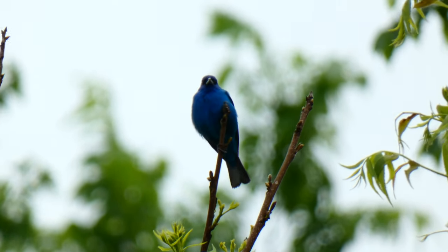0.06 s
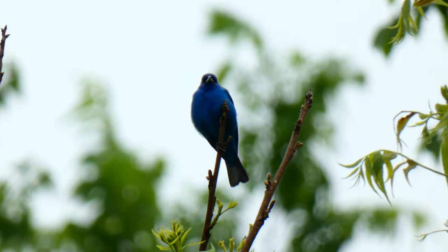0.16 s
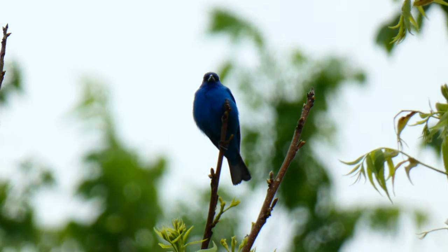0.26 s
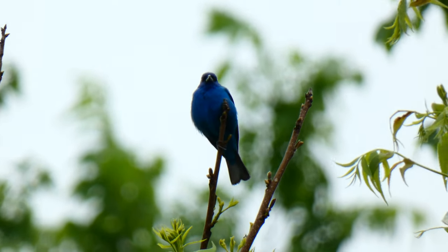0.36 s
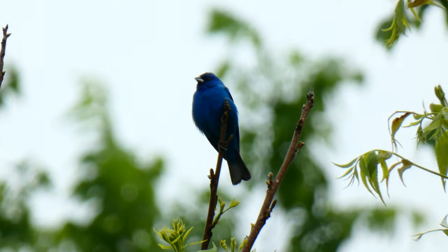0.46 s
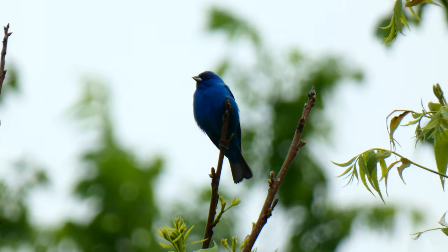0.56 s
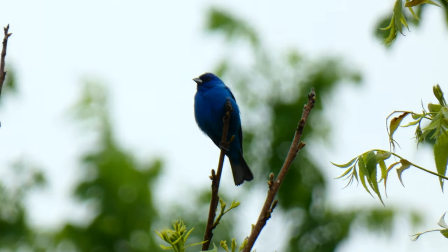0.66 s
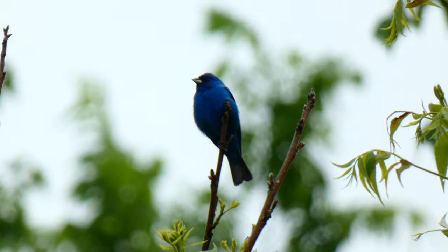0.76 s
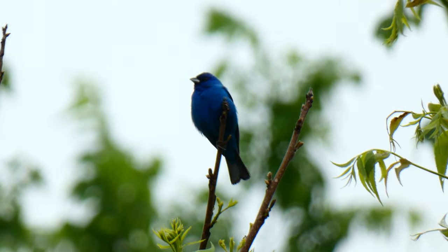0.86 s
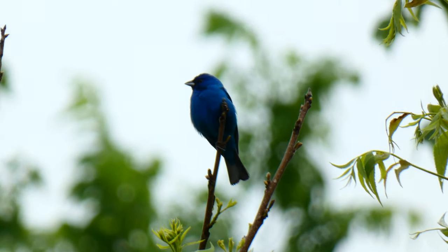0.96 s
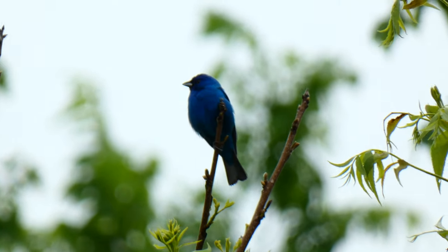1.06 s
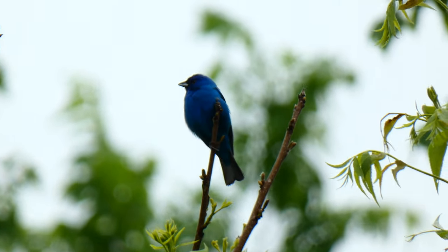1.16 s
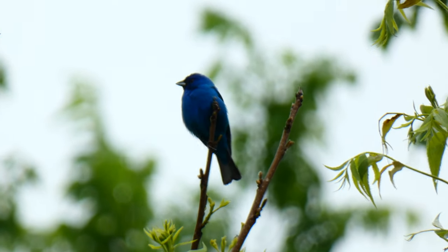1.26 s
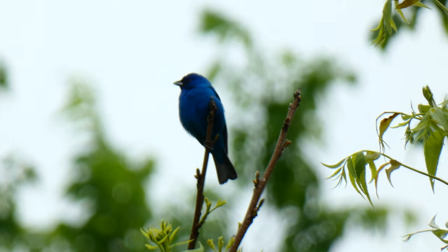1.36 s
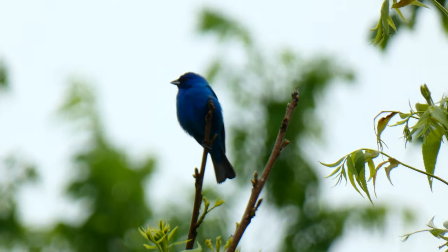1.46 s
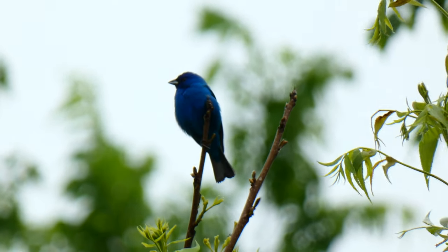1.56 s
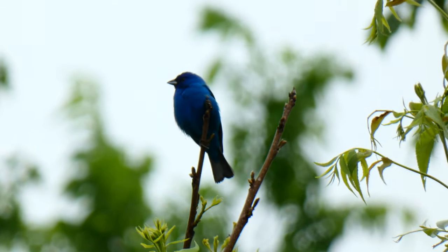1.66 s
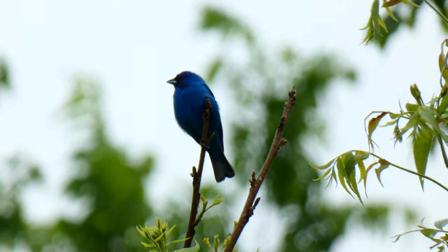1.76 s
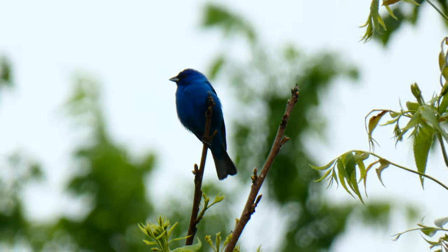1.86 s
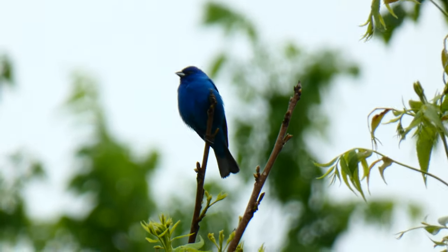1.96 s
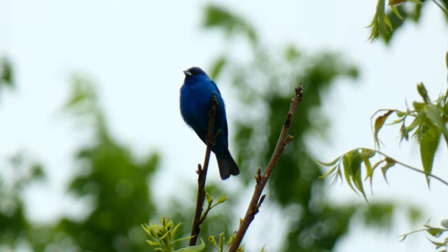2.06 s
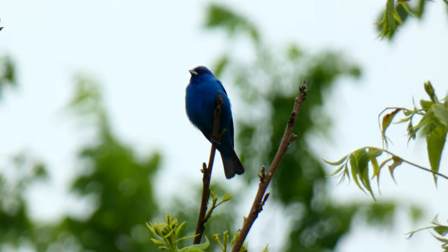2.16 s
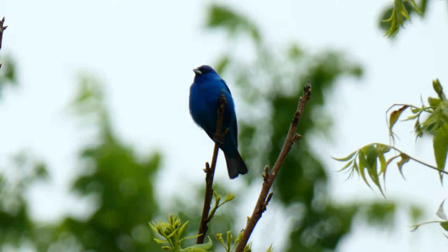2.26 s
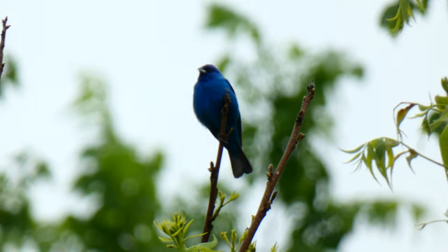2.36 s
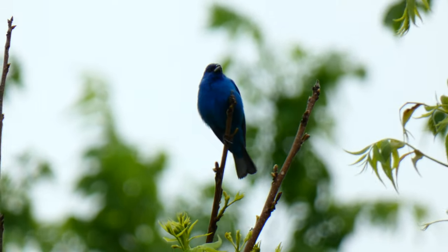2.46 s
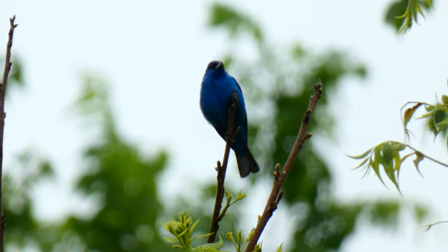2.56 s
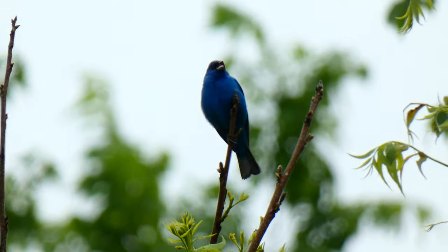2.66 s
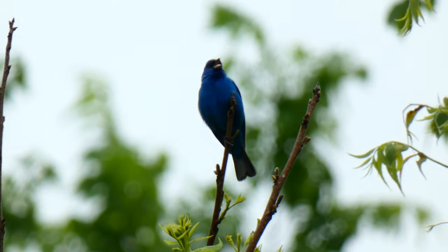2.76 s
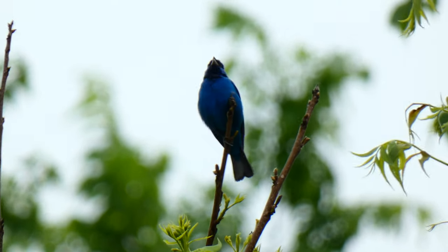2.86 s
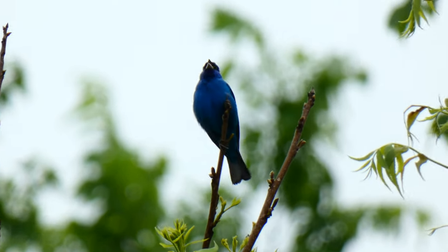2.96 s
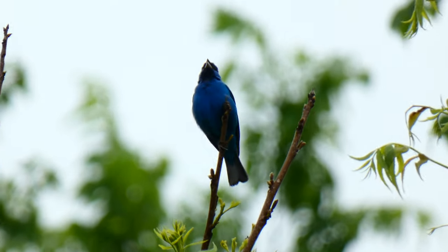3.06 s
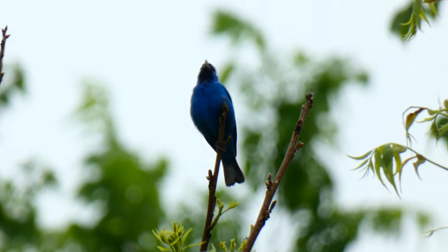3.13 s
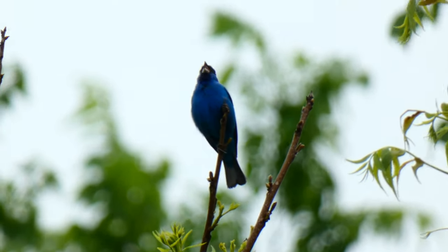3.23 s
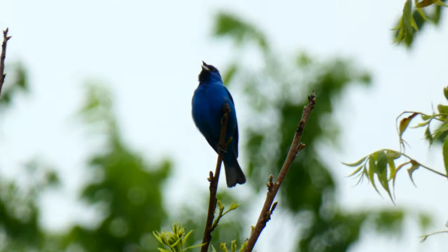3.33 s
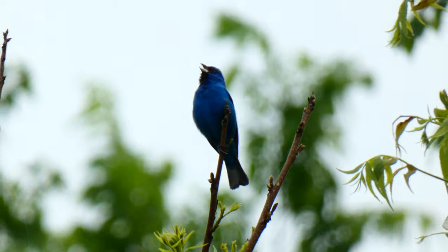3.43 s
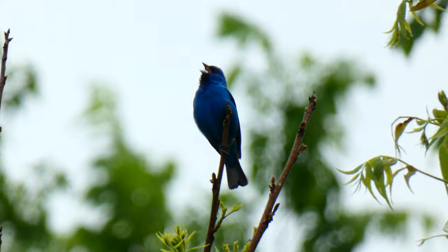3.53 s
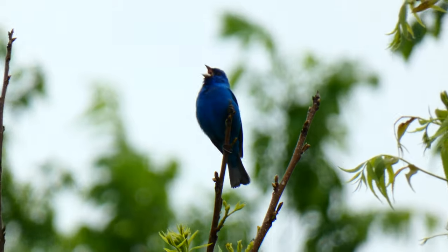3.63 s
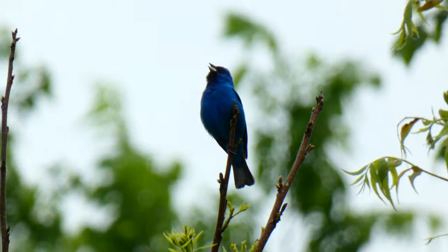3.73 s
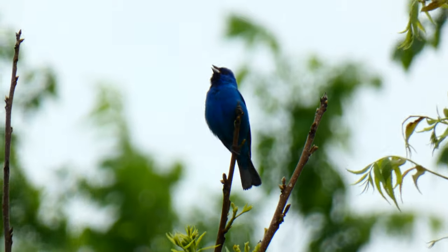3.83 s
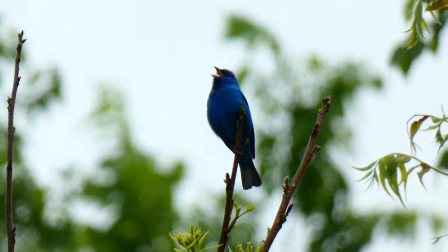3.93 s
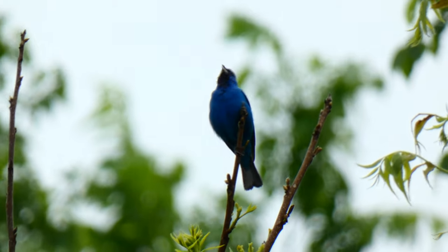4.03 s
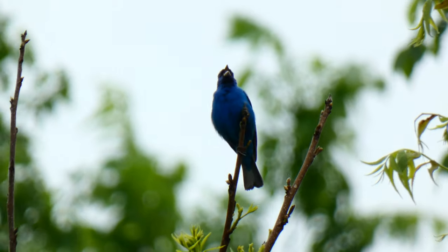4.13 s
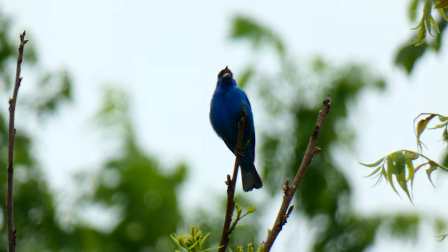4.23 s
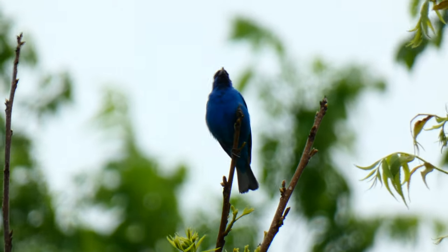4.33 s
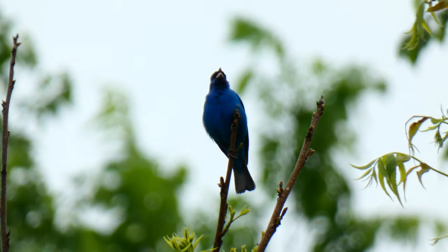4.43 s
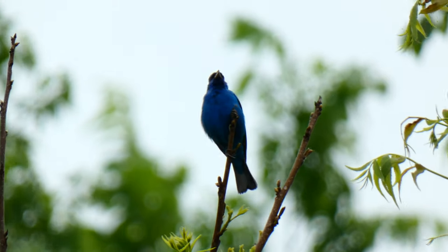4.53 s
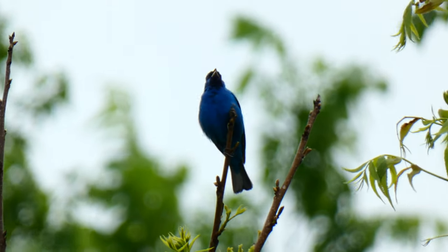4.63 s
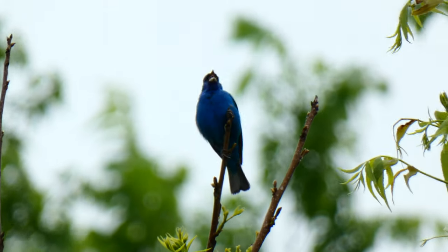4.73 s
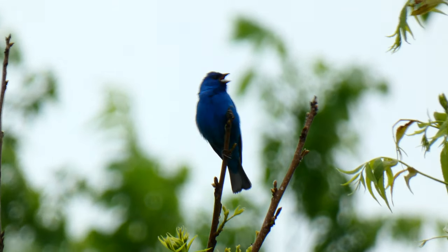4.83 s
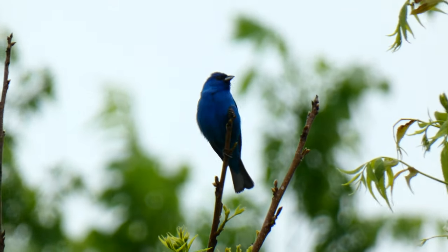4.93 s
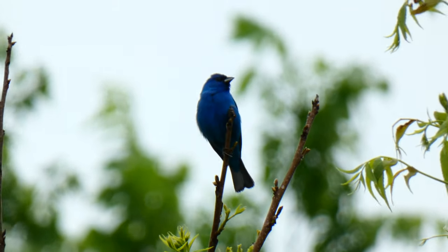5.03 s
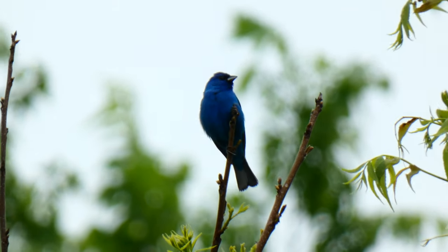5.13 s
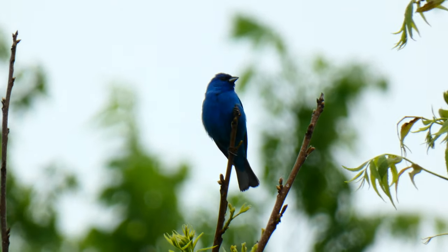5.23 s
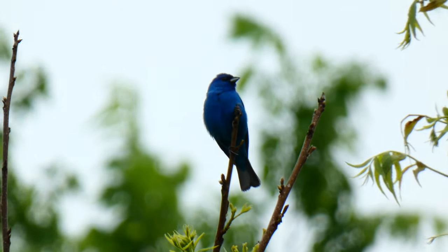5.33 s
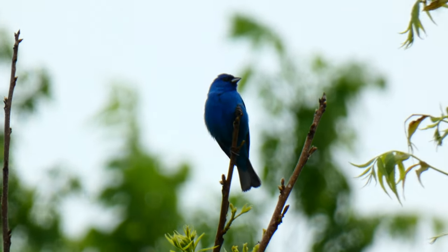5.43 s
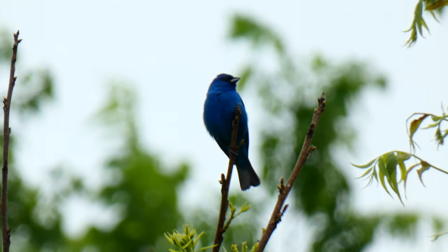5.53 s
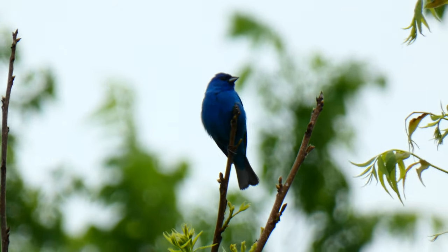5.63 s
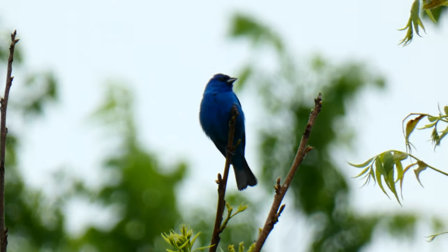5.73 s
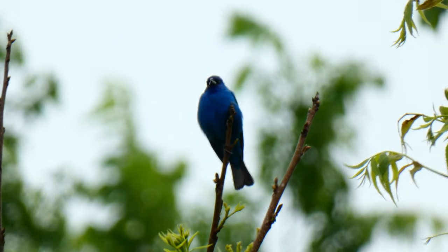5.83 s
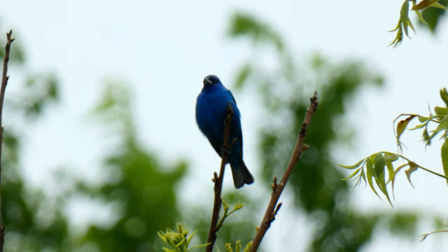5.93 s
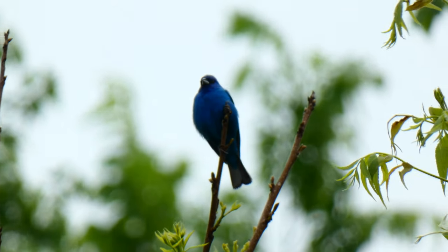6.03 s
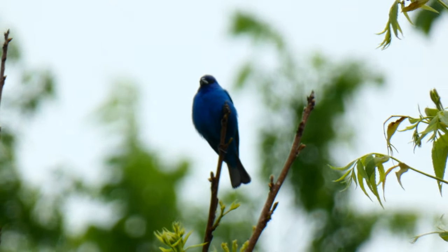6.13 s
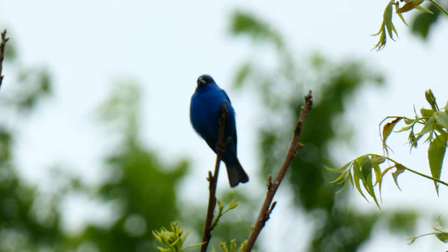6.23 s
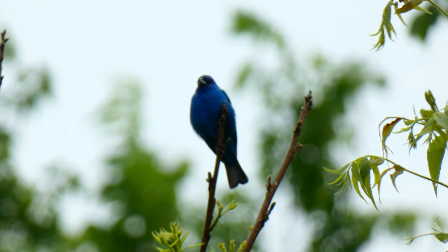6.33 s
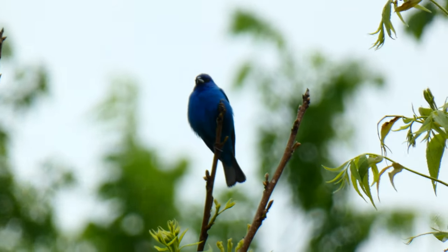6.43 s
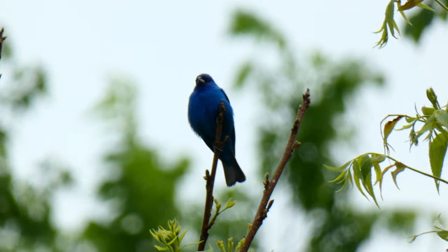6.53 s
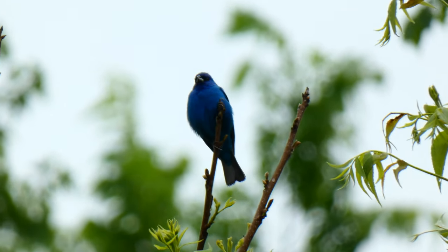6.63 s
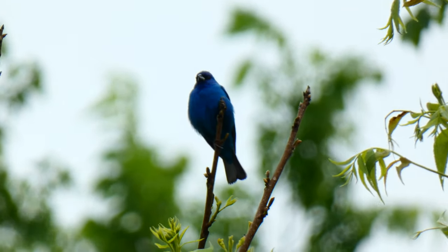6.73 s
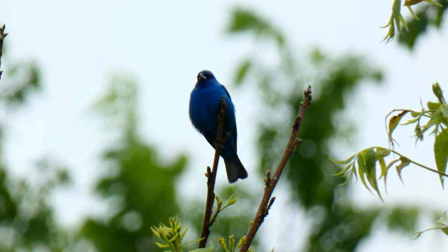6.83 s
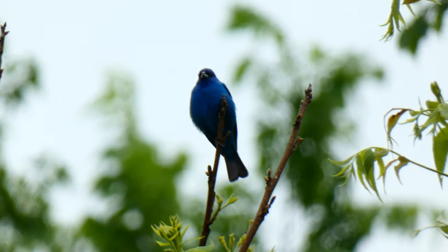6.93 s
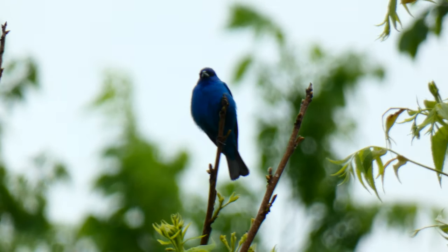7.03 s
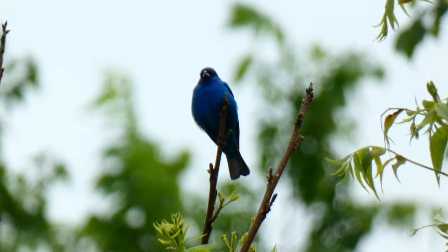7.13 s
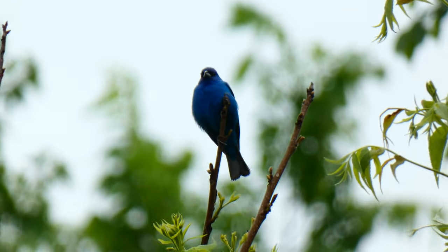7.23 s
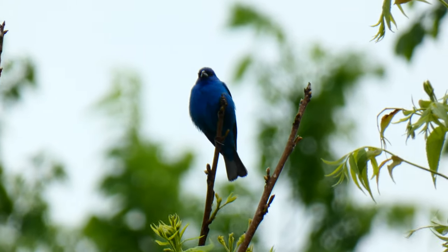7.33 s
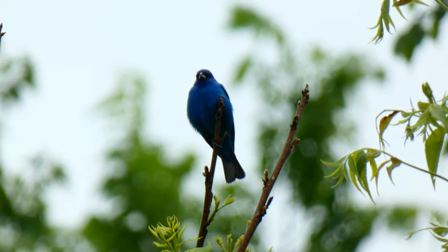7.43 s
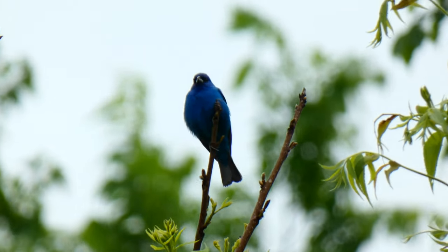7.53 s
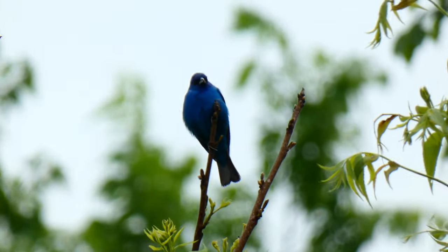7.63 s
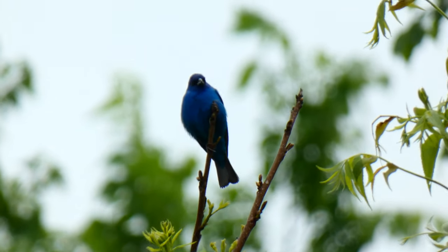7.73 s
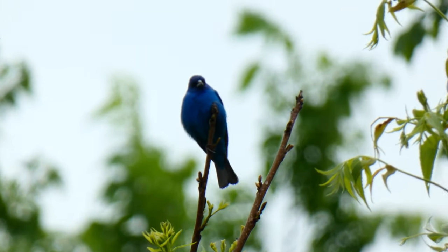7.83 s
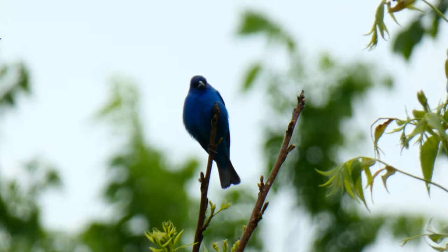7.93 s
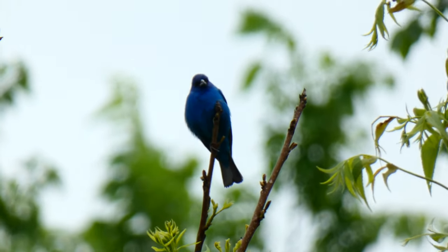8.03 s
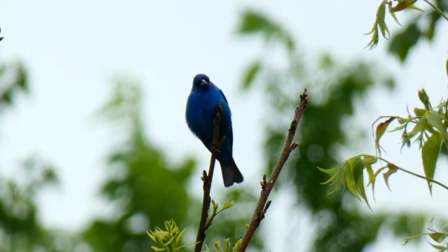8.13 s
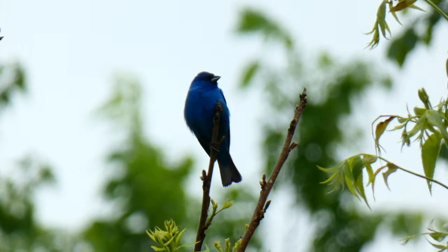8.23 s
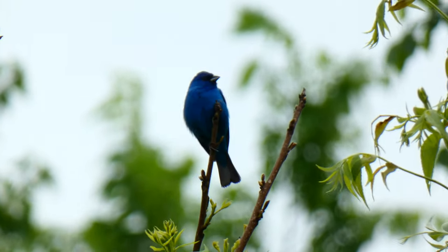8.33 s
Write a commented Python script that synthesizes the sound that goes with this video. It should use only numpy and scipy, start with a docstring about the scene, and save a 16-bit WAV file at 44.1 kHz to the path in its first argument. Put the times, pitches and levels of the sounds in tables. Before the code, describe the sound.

A small songbird sings one high, quick song of paired notes outdoors, with faint distant chirps and a low steady hum around it.

```python
"""A bunting on a bare twig sings one song: thin whistles, two stutters, a buzz, two swoops, a flourish.
Its voice organ, the syrinx, makes an almost pure tone that slides quickly up and down in pitch.
Swaying trees scatter the song back, and other small birds chirp far off.
Under it lie a faint insect, one short low note, a distant rumble, the hum and ticks of a camera's
lens motor, and microphone hiss."""
import sys
import numpy as np
from scipy import signal
from scipy.fft import rfft, irfft, next_fast_len
from scipy.io import wavfile
from scipy.ndimage import uniform_filter1d, map_coordinates

SR = 44100
rng = np.random.default_rng(int(sys.argv[2]) if len(sys.argv) > 2 else 0)


def bounce(signal):
    """Save signal as a 16-bit WAV file at the path given by the first command-line argument."""
    frames = np.transpose(np.atleast_2d(signal))
    limited = np.clip(frames, -1, 1)
    pcm = np.round(limited * 32767).astype(np.int16)
    wavfile.write(sys.argv[1], SR, pcm)


N = 369558


# how well the throat and beak let overtones out: (frequency [Hz], gain [dB])
BEAK_GAIN = [(5000, -11.5), (7500, 12), (8600, 11.5), (10500, 3.5), (13000, -3.5), (15500, -1.5)]
def syrinx(hz, gain, tremble=.004, bright_db=0, second_db=-50, third_db=-41):
    """A bird's voice: a slightly trembling tone, two flickering overtones and a rasp."""
    edge = rasp(hz)
    hz = hz * (1 + tremble * wobble(500, len(hz)))
    phase = 2 * np.pi * np.cumsum(hz) / SR
    overtones = 0
    for k, db in [(2, second_db + bright_db), (3, third_db)]:
        overtones += amp(db + along(BEAK_GAIN, k * hz)) * np.sin(k * phase) * (k * hz < SR / 2)
    flicker = amp(3.5 * wobble(160, len(hz)))
    fade = signal.windows.tukey(len(hz), min(1, .004 * SR / len(hz)))
    shimmer = amp(.7 * wobble(200, len(hz)))
    return np.sqrt(2) * gain * fade * shimmer * (np.sin(phase) + flicker * overtones + edge)


def rasp(hz, level_db=-37, fast_hz_per_s=200000, low_hz=9000, high_hz=13000):
    """A hissy edge on the voice, stronger when the pitch is high and moving fast."""
    speed = np.minimum(np.abs(np.gradient(hz)) * SR / fast_hz_per_s, 1)
    speed = uniform_filter1d(speed, size=300)
    band = signal.butter(2, [low_hz, high_hz], "band", fs=SR)
    edge = signal.lfilter(*band, rng.standard_normal(len(hz)))
    return amp(level_db) * speed * (2 * hz / low_hz) ** 1.4 * unit(edge)


# how strongly the bird sings each pitch: (pitch [Hz], gain [dB])
VOICE_STRENGTH = [(2000, -39), (2450, -16), (2800, -15.5), (3060, -8.5), (3500, -8.5), (3800, 0.5),
                  (4300, -0.5), (4700, -2), (5400, 1), (6100, 0.5), (6650, -3.5), (7150, -19.5),
                  (8500, -21)]
def glide(hz, gain, break_hz=4037, break_width_hz=126, break_db=-9):
    """A sliding note: loud in the middle of the bird's range, with a dip where the voice breaks."""
    dip_db = break_db * np.exp(-((hz - break_hz) / break_width_hz) ** 2)
    return syrinx(hz, gain * amp(along(VOICE_STRENGTH, hz) + dip_db))


# held notes: (time [s], length [s], start pitch [Hz], middle pitch [Hz], end pitch [Hz], level [dB])
WHISTLE_NOTES = [(2.533, 0.045, 5950, 5900, 5100, -58.5), (2.585, 0.053, 5120, 5245, 5160, -44.5),
                 (2.756, 0.052, 6250, 6700, 6750, -40), (2.81, .062, 5835, 5924, 5900, -30.5),
                 (3.16, 0.028, 2770, 3014, 3000, -39.5), (3.417, 0.026, 2800, 3015, 3080, -36.5)]
# each whistle swells and breaks off: (share of its length [0 to 1], gain [dB])
WHISTLE_SWELL = [(0, -17), (.4, -3.5), (.7, -2.5), (.88, 0.5), (1, -10)]
# extra strength of the overtone an octave up: (time [s], boost [dB])
OCTAVE_BOOST = [(2.74, 0), (2.76, 25), (2.805, 26), (2.82, 9)]
def whistles():
    """Notes of nearly level pitch: the song's opening, and a pip after each stutter."""
    out = np.zeros(N)
    for s, length, first, middle, last, db in WHISTLE_NOTES:
        u = np.linspace(0, 1, int(length * SR))
        hz = arc(2 * u - 1, first, middle, last)
        swell_db, = curves(WHISTLE_SWELL, u)
        bright_db, = curves(OCTAVE_BOOST, s + u * length)
        add(out, s, syrinx(hz, amp(db + swell_db), bright_db=bright_db))
    return out


# sliding notes: (time [s], length [s], from pitch [Hz], to pitch [Hz], settling time [s], effort [dB])
SLIDE_NOTES = [(2.866, 0.15, 6060, 3700, 0.049, -37), (3.201, 0.084, 4360, 3374, 0.044, -24.5),
               (3.453, 0.086, 4467, 3310, .05, -23.5), (4.175, .1, 2364, 4247, 0.02, -23.5),
               (4.506, 0.097, 2144, 4300, 0.02, -24.5)]
def slides(attack_s=0.017, release_s=0.013):
    """The voice leaves one pitch lazily and settles toward another."""
    out = np.zeros(N)
    for s, length, from_hz, to_hz, settle, db in SLIDE_NOTES:
        t = np.arange(int(length * SR)) / SR
        hz = to_hz + (from_hz - to_hz) * np.exp(-(t / settle) ** 1.48)
        fade = np.minimum(t / attack_s, 1) * np.minimum((length - t) / release_s, 1)
        add(out, s, glide(hz, amp(db) * fade))
    return out


# the two stutters: (time [s], level [dB])
STUTTER_STARTS = [(3.1, -27.5), (3.3551, -22.5)]
# the four falling notes in a stutter: (gain [dB])
STUTTER_GAINS = [-9.5, -2, -1.5, -2.5]
def stutters(spacing_s=.0131, note_s=0.019, top_hz=6690, end_hz=3710, sink_hz=290):
    """Quick overlapping notes; each hangs at the top, then plunges lower than the one before."""
    out, u = np.zeros(N), np.linspace(0, 1, int(note_s * SR))
    envelope = np.abs(np.sin(np.pi * u)) ** 1.5
    for s, db in STUTTER_STARTS:
        for k, note_db in enumerate(STUTTER_GAINS):
            hz = top_hz + (end_hz - k * sink_hz - top_hz) * u ** 2
            add(out, s + k * spacing_s, syrinx(hz, amp(db + note_db) * envelope))
    return out


# the buzz rises and falls: (time [s], centre pitch [Hz], level [dB])
BUZZ_PATH = [(3.624, 3800, -45), (3.648, 4260, -26), (3.66, 4490, -27), (3.68, 5590, -23.5),
             (3.70, 6070, -24.5), (3.725, 6330, -26.5), (3.76, 5790, -25), (3.782, 5220, -29),
             (3.805, 4510, -29), (3.835, 4055, -28.5), (3.86, 3750, -33.5), (3.885, 3460, -36.5),
             (3.915, 3356, -38.5), (3.93, 3300, -63.5)]
# its swings slow down and narrow: (time [s], swings [per s], depth [share of the pitch])
BUZZ_SWINGS = [(3.624, 103, .14), (3.74, 97, .145), (3.83, 92, .105), (3.93, 84, .09)]
def buzz(dip_db=7.5):
    """A note whose pitch swings fast, loud on each rise and weak on the fall back."""
    out, t = np.zeros(N), span(BUZZ_PATH)
    hz, db = curves(BUZZ_PATH, t)
    rate, depth = curves(BUZZ_SWINGS, t)
    turn = -3.5 + 2 * np.pi * np.cumsum(rate) / SR + 0.62 * wobble(70, len(t))
    swing = depth * (np.sin(turn) - 0.34 * np.sin(2 * turn) - 0.04 * np.cos(2 * turn))  # lopsided
    gain = amp(db + 2.5 - dip_db * (1 - np.cos(turn)) / 2)
    add(out, t[0], syrinx(hz * (1 + swing), gain, tremble=.018))
    return out


# the two swoops: (time [s], effort [dB])
SWOOP_STARTS = [(4.031, -25.5), (4.3501, -26)]
# each shoots up and sinks: (time into the swoop [s], pitch [Hz])
SWOOP_PATH = [(0, 4254), (.015, 8100), (.023, 7150), (.035, 6580), (.062, 5435), (.087, 3640), (.106, 3060),
              (.122, 2440)]
# the other side of the syrinx shoots up too: (time into the swoop [s], pitch [Hz])
UPSTROKE_PATH = [(.002, 5200), (.007, 7560), (.0115, 9500), (.0135, 9900)]
def swoops(attack_s=0.0096, release_s=0.014, upstroke_db=-16.5):
    """One deep swoop, sung twice; at its start both sides of the syrinx sound."""
    out, t, up_t = np.zeros(N), span(SWOOP_PATH), span(UPSTROKE_PATH)
    hz, = curves(SWOOP_PATH, t)
    up_hz, = curves(UPSTROKE_PATH, up_t)
    fade = np.minimum(t / attack_s, 1) * np.minimum((t[-1] - t) / release_s, 1)
    for s, db in SWOOP_STARTS:
        add(out, s, glide(hz, amp(db) * fade))
        add(out, s + up_t[0], syrinx(up_hz, amp(db + upstroke_db)))
    return out


# the closing notes, one list of points each: (time [s], pitch [Hz], effort [dB])
FLOURISH_NOTES = [
    [(4.731, 3410, -34), (4.7385, 6420, -31.5), (4.744, 5260, -32), (4.754, 4510, -24.5),
     (4.771, 3500, -28)],
    [(4.782, 2900, -34), (4.793, 3200, -35), (4.8, 3756, -28.5), (4.811, 4230, -28.5), (4.822, 6150, -30.5),
     (4.874, 6700, -25.5)],
    [(4.871, 8640, -40), (4.884, 7780, -17.5), (4.892, 6130, -32), (4.914, 5400, -29), (4.936, 5390, -27.5),
     (4.964, 5180, -36)],
]
def flourish():
    """Three glides end the song: a flick, a climb and a drop."""
    out = np.zeros(N)
    for note in FLOURISH_NOTES:
        t = span(note)
        hz, db = curves(note, t)
        add(out, t[0], glide(hz, amp(db)))
    return out


def near_echoes(x, first_s=0.0062, last_s=0.04, count=8):
    """Quick echoes off nearby branches and the ground, which beat against the glides."""
    out = np.zeros(N)
    for delay in np.linspace(first_s, last_s, count) + rng.uniform(-0.0016, .002, count):
        add(out, delay, x / np.sqrt(count))
    return out


# how long the trees echo: (frequency [Hz], time to fade by 60 dB [s])
TREE_FADE = [(2000, 0.69), (4000, 0.73), (6500, 0.75), (9000, 0.8), (15000, 0.21)]
# how strongly they answer: (frequency [Hz], gain [dB])
TREE_GAIN = [(2000, 7), (3200, -3), (4300, -0.5), (6500, -5), (7800, -3), (14000, 9.5)]
def trees(x, build_s=0.0034):
    """Leaves and trunks scatter a sound into a soft tail that builds up and dies away."""
    hz, t, bands = signal.stft(rng.standard_normal(SR), SR, nperseg=256)
    envelope = amp(-60 * t / along(TREE_FADE, hz)[:, None]) * (1 - np.exp(-t / build_s))
    _, tail = signal.istft(bands * envelope, SR, nperseg=256)
    echo = signal.fftconvolve(x, tail / np.linalg.norm(tail))[:N]
    return filtered(echo, lambda f: amp(along(TREE_GAIN, f)))


def swaying_trees(x, patterns=3):
    """The leaves move, so the echo drifts from one pattern to another."""
    weights = np.array([wobble(9, N) for _ in range(patterns)])
    weights /= np.sqrt(np.sum(weights ** 2, axis=0) + .1)
    return sum(w * trees(x) for w in weights)


# calls of other birds: (time [s], length [s], start pitch [Hz], end pitch [Hz], level [dB])
FAR_CHIRPS = [(.047, 0.023, 5600, 7060, -48.5), (0.066, 0.076, 7700, 7890, -58),
              (.125, 0.064, 6850, 6190, -50), (0.368, .035, 5710, 6770, -50),
              (0.38, 0.11, 6550, 6300, -49.5), (0.41, .12, 8350, 7370, -59.5),
              (0.483, .1, 2870, 2240, -67.5), (.867, 0.035, 2860, 2280, -66),
              (1.014, 0.06, 2350, 2950, -67), (1.182, 0.047, 3150, 2640, -64),
              (1.483, 0.053, 6550, 6080, -59.5), (1.721, 0.057, 6300, 4480, -56),
              (1.748, 0.039, 4800, 4770, -57.5), (1.78, 0.054, 6900, 5760, -55.5),
              (1.905, .036, 8000, 7500, -62), (1.991, .042, 6400, 4600, -52.5),
              (2.068, 0.038, 6900, 6240, -50), (2.1, .025, 6600, 4460, -49.5),
              (2.303, .12, 6500, 6270, -56.5), (5.119, 0.05, 7200, 5530, -49.5),
              (5.56, .045, 6300, 8430, -58), (5.857, 0.047, 6100, 7180, -56), (6.65, .15, 7650, 7750, -75),
              (7.302, 0.053, 6700, 4960, -57.5), (7.374, 0.026, 5600, 6800, -55)]
def far_birds(arch_hz=111.3):
    """Thin chirps whose pitch bulges upward in the middle."""
    out = np.zeros(N)
    for s, length, first, last, db in FAR_CHIRPS:
        u = np.linspace(-1, 1, int(length * SR))
        hz = arc(u, first, (first + last) / 2 + arch_hz, last)
        add(out, s, syrinx(hz, amp(db) * np.cos(np.pi * u / 2), tremble=.009))
    return out


# when the insect sounds: (start [s], end [s], level [dB])
INSECT_SPELLS = [(0, .6, -77), (5.6, 6.1, -76), (6.5, 7.05, -76)]
def insect(hz=4930, width_hz=110):
    """A thin, far trill: a narrow band of noise that comes and goes."""
    t = np.arange(N) / SR
    gain = sum(amp(db) * np.interp(t, [start - .2, start, end, end + 0.061], [0, 1, 1, 0])
               for start, end, db in INSECT_SPELLS)
    return gain * noise(lambda f: resonance(f, hz, width_hz))


def short_note():
    """One faint low note."""
    out = np.zeros(N)
    add(out, 6.37, blip(hz=960, length_s=0.042, db=-53))
    return out


# the rumble's tone colour: (frequency [Hz], relative level [dB])
RUMBLE_COLOUR = [(25, -30), (45, -56), (70, -33), (95, -11), (122, 0.5), (150, -4), (188, 2), (240, -17),
                 (400, -24), (800, -66), (2000, -78)]
# where it grows louder: (time [s], half length [s], rise [dB])
RUMBLE_RISES = [(1.3, 0.44, 4.5), (3.12, 0.39, 11.5), (5.0, 0.33, 6)]
def distant_rumble(start_db=-60, fade_db_per_s=0.6, bottom_db=-67.5):
    """Low noise that swells and slowly recedes over a steady, deep bottom."""
    db = start_db - fade_db_per_s * np.arange(N) / SR + swells(RUMBLE_RISES)
    rumble = amp(db) * noise(lambda f: amp(along(RUMBLE_COLOUR, f)))
    return rumble + amp(bottom_db) * noise(lambda f: resonance(f, hz=107.7, width_hz=33.5))


# the lens motor's main ring: (pitch [Hz], width [Hz])
MOTOR_RING = (814.5, 62.7)
# where it works harder: (time [s], half length [s], rise [dB])
MOTOR_WORK = [(.68, 0.7, 2.5), (2.8, 0.31, 2.5), (3.65, 0.45, 4.5), (4.47, 0.081, 7), (6.35, 0.22, 5.5),
              (7.68, 0.091, 3), (8.18, 0.32, 3)]
# its brief surges: (time [s], relative level [dB])
MOTOR_SURGES = [(0.702, -34), (2.871, -31), (4.42, -33), (6.004, -35), (6.284, -33), (6.402, -39.5),
                (6.691, -32), (7.678, -41), (7.776, -35), (8.143, -31), (8.184, -30), (8.281, -32.5)]
# weaker rings of the camera body: (pitch [Hz], width [Hz], relative level [dB])
BODY_RINGS = [(293.7, 17, 1.5), (351.6, 22, 1.5), (416.7, 23, 5), (610, 12.3, -5), (756, 64, -0.5),
              (961, 102, -5), (1182, 31, -6), (1329, 133, -8), (1709, 69, -0.5), (2094, 87, -3),
              (2347, 44, -8.5)]
def lens_motor(idle_db=-60.5, body_db=-62, body_follow=0.38):
    """The motor hums in short, uneven bursts that make the camera body ring."""
    motor_db = idle_db + swells(MOTOR_WORK)
    bursts = amp(6 * np.tanh(wobble(55, N)))
    drive = bursts * rng.standard_normal(N)
    motor = amp(motor_db) * unit(filtered(drive, lambda f: resonance(f, *MOTOR_RING)))
    for s, db in MOTOR_SURGES:
        add(motor, s - .004, blip(hz=MOTOR_RING[0], length_s=0.019, db=db - 12.5))
    shake = np.sqrt(bursts) * rng.standard_normal(N)
    body = filtered(shake, lambda f: sum(amp(db) * resonance(f, hz, w) for hz, w, db in BODY_RINGS))
    body_gain = amp(body_db + body_follow * (motor_db - motor_db.mean()))
    return motor + body_gain * unit(body)


# clicks of the lens: (time [s], relative level [dB], centre frequency [Hz])
LENS_CLICKS = [(0.3624, -48, 8150), (.632, -46.5, 8200), (0.7914, -51.5, 8550), (0.954, -49.5, 9200),
               (1.1184, -49.5, 9900), (2.2946, -39.5, 10600), (2.8405, -46, 10800), (5.7747, -51, 8070),
               (6.014, -54, 9300), (6.4683, -50, 9400), (6.8384, -45, 8500), (7.7633, -55, 9020),
               (8.205, -46, 10400)]
def lens_ticks(fade_s=0.01, width=0.24):
    """The lens mechanism clicks: tiny, bright bursts of noise."""
    out, t = np.zeros(N), np.arange(SR // 50) / SR
    for s, db, hz in LENS_CLICKS:
        band = signal.butter(3, [hz * (1 - width), hz * (1 + width)], "band", fs=SR)
        burst = signal.lfilter(*band, rng.standard_normal(len(t)) * amp(-60 * t / fade_s))
        add(out, s, 2 * amp(db - 6) * burst / np.abs(burst).max())
    return out


# the hiss's tone colour: (frequency [Hz], relative level [dB])
HISS_COLOUR = [(30, -82), (150, -79), (600, -87.5), (1500, -95.5), (2700, -94.5), (3700, -95), (4300, -101),
               (4900, -93.5), (5600, -98.5), (7000, -92.5), (8300, -100), (10000, -95), (13000, -102),
               (15700, -106)]
# how alike left and right are: (frequency [Hz], likeness [0 to 1])
HISS_LIKENESS = [(100, 0.97), (2000, 0.94), (5500, 1), (8000, 0.92), (10000, .6), (15000, 0.25)]
def microphone_hiss(level_db=-64):
    """Even hiss; left and right are less alike in the treble."""
    def response(f):
        likeness = along(HISS_LIKENESS, f)
        return amp(along(HISS_COLOUR, f)) * np.sqrt([1 + likeness, 1 - likeness])
    mid, side = filtered(rng.standard_normal((2, N)), response)
    return amp(level_db) * unit(np.array([mid + side, mid - side]))


def amp(db):
    """Decibels to gain."""
    return 10 ** (np.asarray(db) / 20)


def unit(x):
    """Scale to an average power of 1."""
    return x / np.sqrt(np.mean(x ** 2) + 1e-20)


def along(points, hz):
    """Read (frequency, value) points at hz, on a log axis."""
    f, v = np.transpose(points)
    return np.interp(np.log(hz + 1), np.log(f + 1), v)


def curves(rows, t):
    """Each column after the time, read at the times t."""
    s, *cols = np.transpose(rows)
    return [np.interp(t, np.sort(s), c) for c in cols]


def span(rows):
    """Sample times from the first row to the last."""
    s = np.transpose(rows)[0]
    return np.arange(s.min(), s.max(), 1 / SR)


def arc(u, first, middle, last):
    """A curve through three pitches as u goes from -1 to 1."""
    return middle + u * (last - first) / 2 + u ** 2 * ((first + last) / 2 - middle)


def swells(rows):
    """A level in dB that rises and falls smoothly around each row's time."""
    t = np.arange(N) / SR
    return sum(db * np.exp(-((t - s) / half) ** 2) for s, half, db in rows)


def wobble(rate, size):
    """A smooth curve through `rate` random points a second."""
    points = rng.standard_normal(int(size * rate / SR) + 4)
    return map_coordinates(points, [np.arange(size) * rate / SR])


def blip(hz, length_s, db):
    """A short pure tone that fades in and out."""
    t = np.arange(int(length_s * SR)) / SR
    return amp(db) * np.sin(np.pi * t / length_s) * np.sin(2 * np.pi * hz * t)


def resonance(f, hz, width_hz):
    """A steep-sided peak around hz."""
    return (1 + ((f - hz) / width_hz) ** 2) ** -1.5


def filtered(x, response):
    """Scale each frequency f in x by response(f)."""
    m = next_fast_len(N + SR // 2)
    return irfft(rfft(x, m) * response(np.fft.rfftfreq(m, 1 / SR)), m)[..., :N]


def noise(response):
    """Filtered noise with an average power of 1."""
    return unit(filtered(rng.standard_normal(N), response))


def add(track, s, sound):
    """Mix a sound into a track at time s."""
    part = track[max(round(s * SR), 0):][:len(sound)]
    part += sound[:len(part)]


# a dip in the microphone's treble, applied to the bunting: (frequency [Hz], gain [dB])
TREBLE_DIP = [(6500, -1), (7300, -3), (8200, -4), (9200, 0.5), (10500, 2)]
def scene():
    """The bunting is straight ahead; the far birds are heard mostly by way of the trees."""
    song = whistles() + slides() + stutters() + buzz() + swoops() + flourish()
    far = far_birds()
    singer = song + amp(-14.5) * near_echoes(song) + amp(-14.0) * swaying_trees(song)
    side_echo = amp(-43.0) * trees(song) * np.array([[1], [-1]])
    bunting = filtered(singer + side_echo, lambda hz: amp(along(TREBLE_DIP, hz)))
    others = amp(-10) * far + amp(-2) * swaying_trees(far)
    background = insect() + short_note() + lens_ticks() + distant_rumble() + lens_motor()
    return bunting + others + background + microphone_hiss()


def record(dry, low_cut_hz=70, top_hz=15750):
    """The camera thins the deep bass and keeps nothing above top_hz."""
    return filtered(dry, lambda hz: (hz < top_hz) * hz ** 3 / np.sqrt(hz ** 6 + low_cut_hz ** 6))


dry = scene()
out = record(dry)
bounce(out)
```